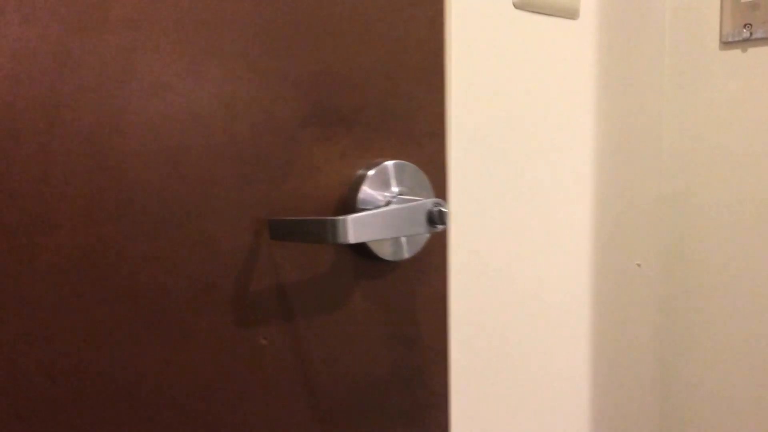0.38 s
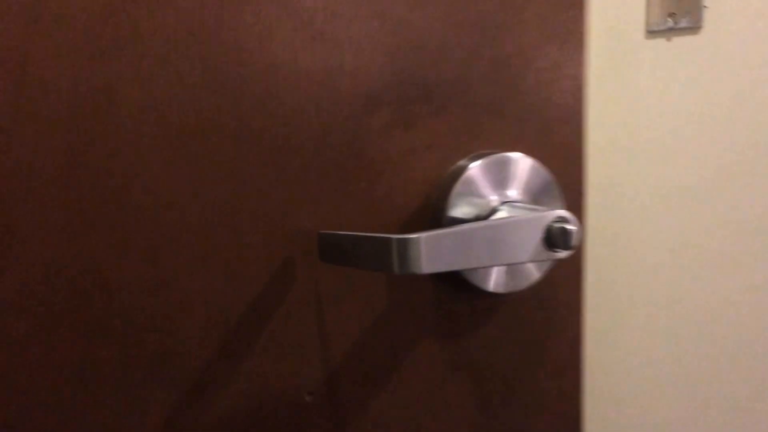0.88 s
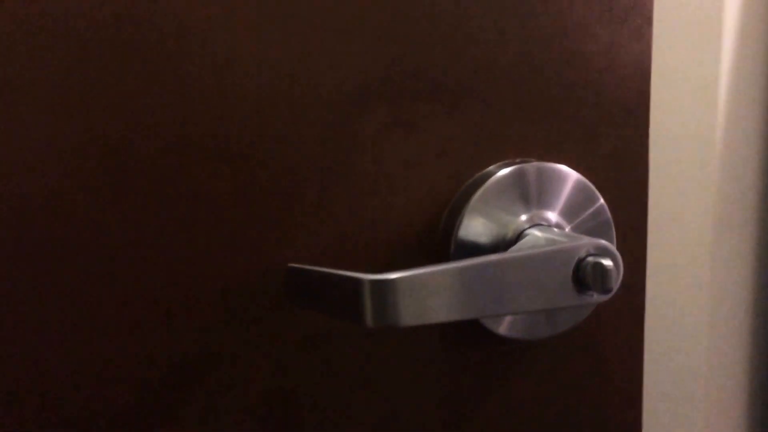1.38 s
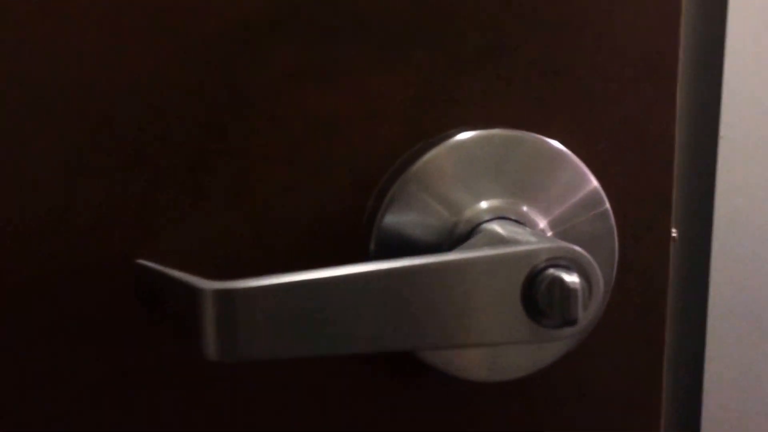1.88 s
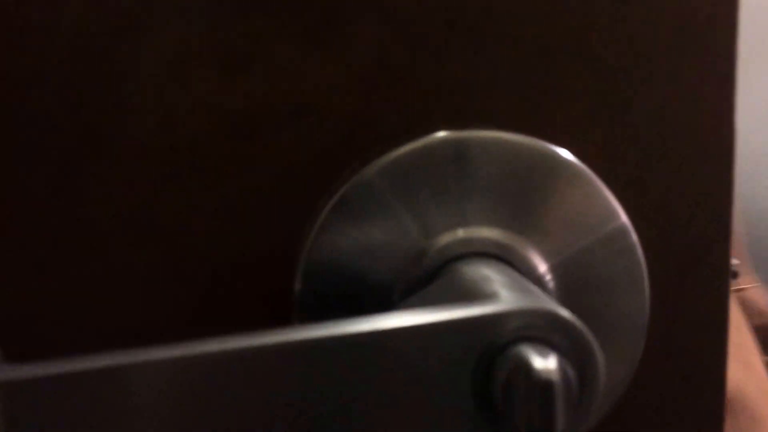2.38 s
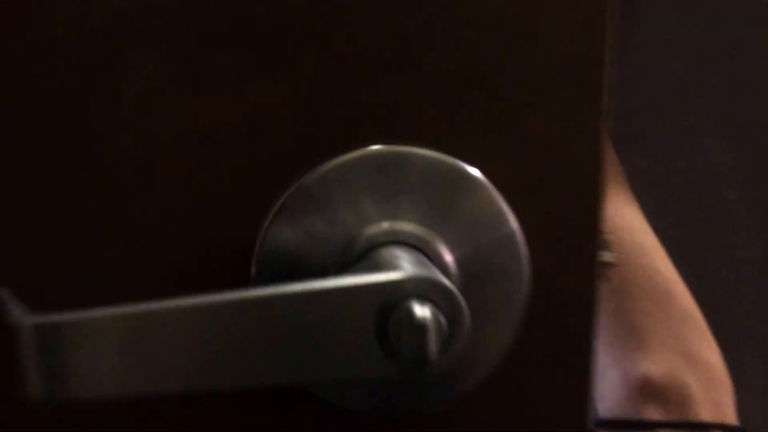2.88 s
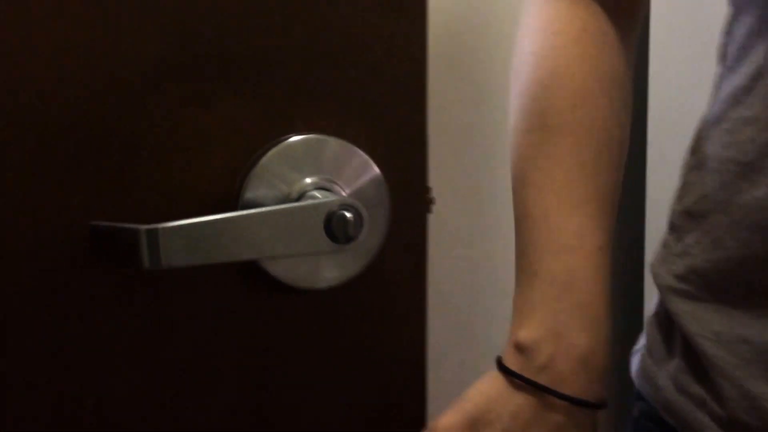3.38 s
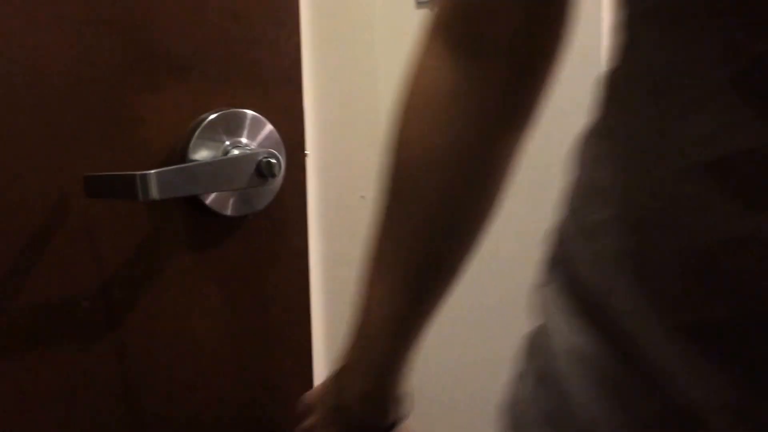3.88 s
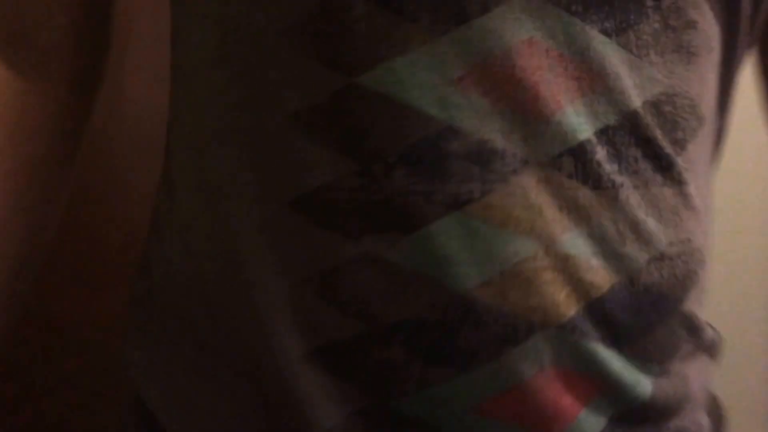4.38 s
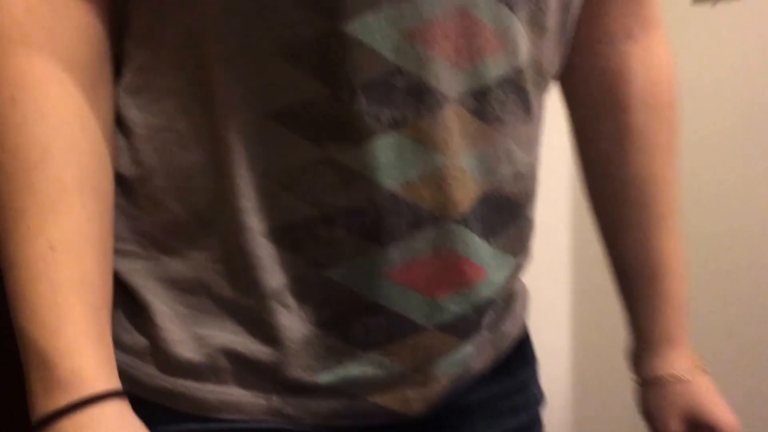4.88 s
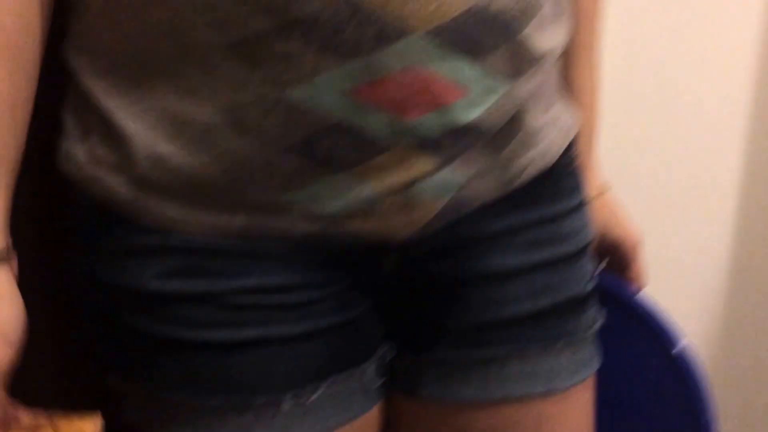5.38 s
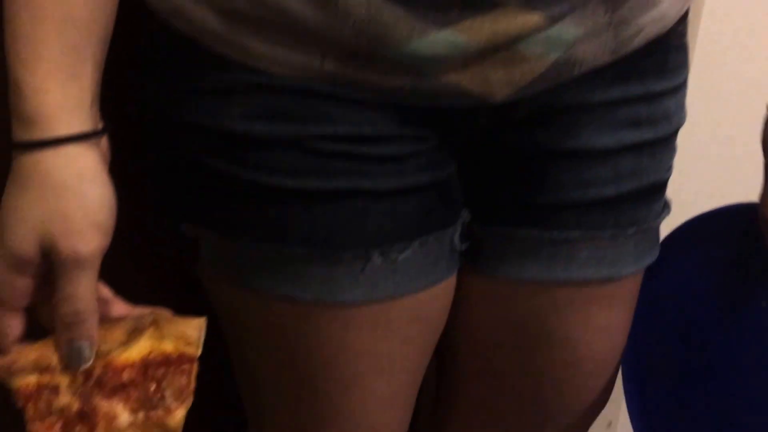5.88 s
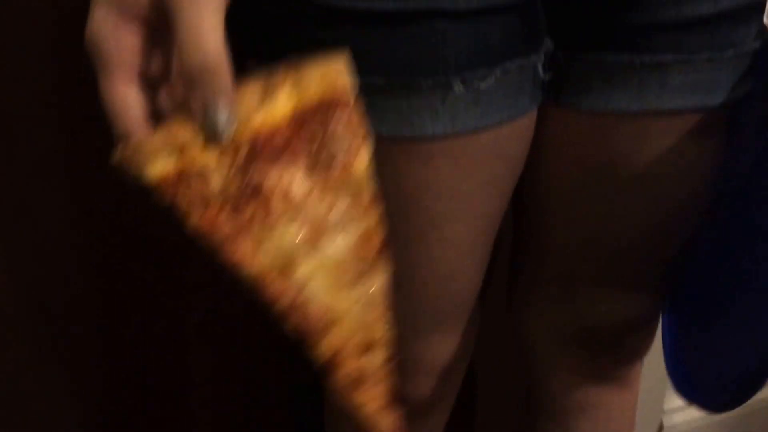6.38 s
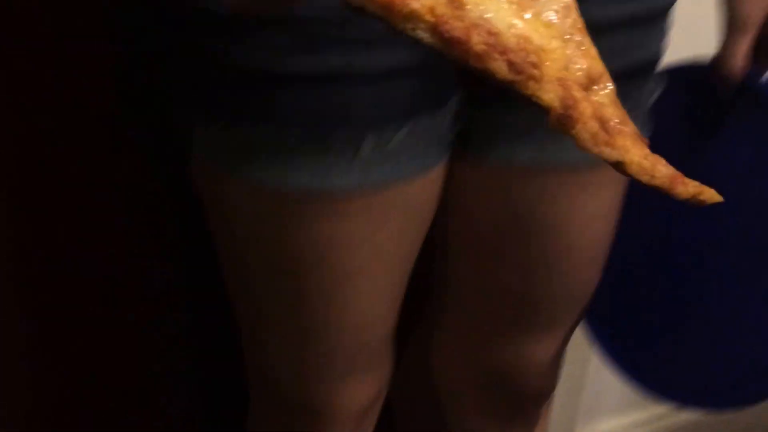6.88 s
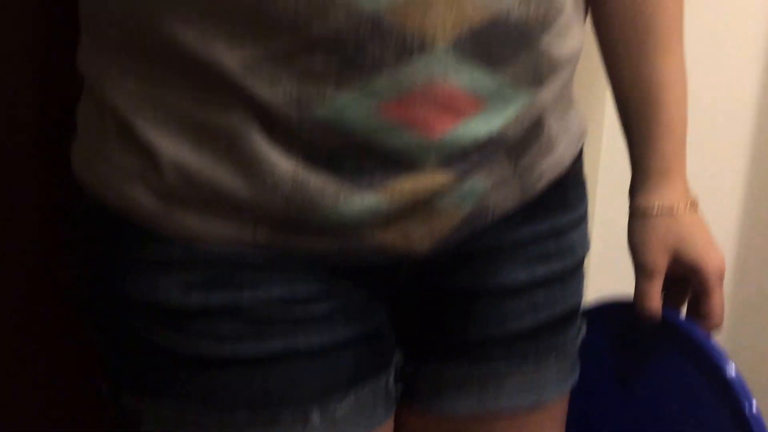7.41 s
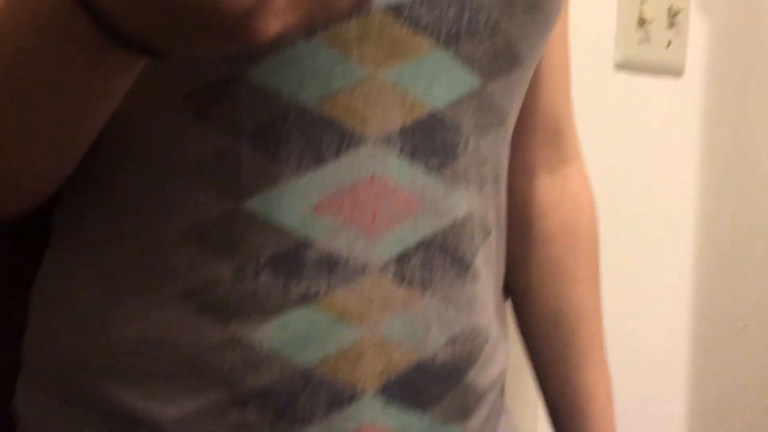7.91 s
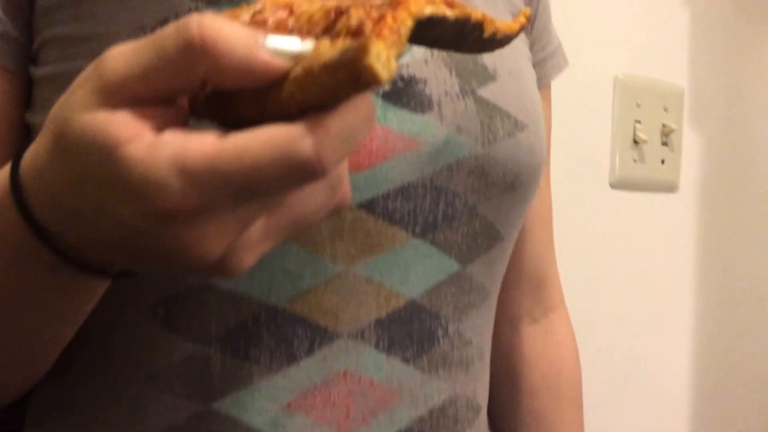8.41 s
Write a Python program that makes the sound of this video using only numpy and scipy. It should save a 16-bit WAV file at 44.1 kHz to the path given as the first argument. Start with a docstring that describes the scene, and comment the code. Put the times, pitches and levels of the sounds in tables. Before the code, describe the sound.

A low, steady ventilation hum fills a small indoor passage. A heavy wooden door with a steel lever handle is worked: muffled latch click, brief rising squeak, busy metallic clatter, two soft knocks, then near quiet. Midway it shuts with a very loud sharp clunk and deep thump, followed by judder, knocks and scuffs. Close microphone with short room reverberation, ducking slightly after the slam; only hum and air remain.

```python
"""A wooden door with a metal lever handle, heard close by in a small hard hallway over droning ventilation.
First the latch clicks behind the closed leaf, then a stick-slip hinge squeaks and more clicks and knocks follow;
light contacts slide while hand, feet and clothes rub as grainy noise. At 4.5 s the bolt rides the strike plate
and the leaf slams, rebounds and settles: contact forces ring steel and wood, and noise thumps the wall and rattles
the frame. A few small knocks from plate or feet follow, then mostly ventilation is left. The microphone's gain
control ducks after loud blows."""
import sys
import numpy as np
from scipy import signal
from scipy.fft import rfft, irfft, next_fast_len
from scipy.io import wavfile
from scipy.ndimage import uniform_filter1d, map_coordinates

SR = 44100
rng = np.random.default_rng(int(sys.argv[2]) if len(sys.argv) > 2 else 0)


def int16_out(signal):
    """Quantize to a 16-bit WAV file."""
    q = np.round(np.clip(np.atleast_2d(signal).T, -1, 1) * 32767)
    wavfile.write(sys.argv[1], SR, q.astype(np.int16))


def linear_from_db(decibels):
    """Turn decibels (scalar or array-like) into linear amplitude factors; 0 gives 1."""
    return 10 ** (np.asarray(decibels, float) / 20)


N = 375902

# Ventilation in the room; the open door weakens the low resonance and lets rumble in:
# t/s, low resonance level/dB, rumble level/dB, air level/dB
DRONE_LEVELS = [(0.0, -42, -52, -50.5), (0.4, -44, -56, -50), (1.2, -42, -56, -52), (1.8, -48, -57, -52.5),
                (2.65, -47, -49, -52.5), (3.5, -46.5, -45, -52), (4.3, -50, -52, -54),
                (4.55, -50, -60, -54), (5.4, -49, -58, -55), (5.9, -45, -60, -51), (7.0, -46, -58, -51),
                (7.3, -44, -52, -51), (7.8, -47, -56, -51), (8.52, -44, -54, -51)]
# Rumble through the open door: f/Hz, relative density level/dB
RUMBLE_SPECTRUM = [(20, -20), (40, -5), (58, 15), (75, 9), (95, 7), (125, -41)]
# Rush of ventilation air: f/Hz, relative density level/dB
AIR_SPECTRUM = [(80, -10), (110, -12), (180, -10), (300, -18.5), (400, -19.5), (600, -26), (2000, -32),
                (2500, -40.5), (3000, -39.5), (3600, -38), (7000, -44.5), (9000, -49), (15000, -58)]
# Narrow duct resonances: f/Hz, width/Hz, mean rms level/dB
DUCT_MODES = [(195.3, 32, -56), (250, 26, -56.5), (293.2, 15.4, -60), (461, 25, -60), (528.6, 20, -67.5),
              (921, 10, -74), (3426, 73, -78), (5190, 200, -81.5), (6210, 250, -81.5), (7100, 310, -87)]
# Motor lines: f/Hz, level/dB before a common lift
MOTOR_LINES = [(59.2, -55), (118.4, -55), (1468, -71), (1938, -74.5)]
# Rubbing of hand, feet and clothes: t/s, scuff level/dB, cloth level/dB, both before their flutter
RUBBING_LEVELS = [(0.0, -64, -85), (0.2, -56, -66), (0.33, -66, -85), (0.68, -59, -76), (0.84, -56, -61),
                  (1.03, -47, -66), (1.19, -66, -66), (1.45, -63, -63.5), (1.9, -68, -68), (2.25, -57, -69),
                  (2.4, -70, -100), (3.23, -79, -97), (3.44, -57, -65), (3.6, -57, -62), (3.75, -70, -72),
                  (4.5, -80, -72), (4.88, -70, -90), (5.0, -60, -64), (5.12, -75, -85), (5.35, -66, -61),
                  (5.56, -55, -56), (5.66, -63, -68), (6.2, -64, -68), (6.6, -80, -85)]
# Dull rubbing and scuffing: f/Hz, relative density level/dB
SCUFF_SPECTRUM = [(200, -35), (500, -0.5), (1200, -6), (2000, -8.5), (3000, -20), (5000, -75)]
# Moving cloth: f/Hz, relative density level/dB
CLOTH_SPECTRUM = [(1500, -31), (3000, 1), (5000, -2.5), (8000, -6), (12000, -13), (15500, -7)]
# Decay of the hallway: f/Hz, t60/s
HALL_DECAY = [(100, 1), (500, 0.31), (2000, 0.26), (6000, 0.21), (14000, 0.069)]
# Heavy blows that shake the frame: t/s, starting thump level/dB, rattle over thump level/dB, thump t60/s
FRAME_BLOWS = [(0.19, -35, -22, .4), (0.338, -29, -14, .45), (1.085, -33, -16, .3),
               (4.613, -15.5, -0.4, .56), (4.92, -38, 1.5, .6), (5.275, -20.5, -13, .36)]
# Thump of wall and floor: f/Hz, relative density level/dB
THUMP_SPECTRUM = [(25, -20), (45, -6), (65, 3), (105, 4), (180, -1.5), (300, -6), (500, -9), (900, -25),
                  (2500, -80)]
# Rattle of the frame: f/Hz, relative density level/dB
RATTLE_SPECTRUM = [(150, -14), (500, -0.6), (1200, -5), (2300, -7), (3200, -19), (5000, -36), (12000, -65)]
# Squeaking hinge: t/s, slip rate f/Hz, level/dB
HINGE_SQUEAK = [(.58, 358, -81), (.62, 371.4, -54), (.66, 374, -47), (.7, 393, -42.5), (.73, 430, -61),
                (.77, 485, -45), (.8, 475, -56), (.83, 451, -46), (.86, 457, -76)]
# Resonances of the latch steel: f/Hz, width/Hz, level/dB
LATCH_MODES = [(1660, 325, 3), (2016, 170, 8), (2130, 360, 4), (2750, 480, 1), (2850, 660, 1),
               (3545, 950, -2.5), (4020, 310, 0.5), (4500, 480, -5.5)]
# Resonances of thin steel parts: f/Hz, width/Hz, level/dB
SIZZLE_MODES = [(5120, 700, 1.5), (5810, 900, 2.5), (6480, 870, 1), (7730, 1470, -3), (9420, 1400, -3.5),
                (10950, 1330, -5.5), (12900, 2700, -11.5)]
# Resonances of the wooden panel: f/Hz, width/Hz, level/dB
PANEL_MODES = [(292, 73, -5.5), (340, 64, -0.5), (430, 63, 0), (535, 87, -0.5), (700, 78, 0.5),
               (810, 92, 0.5), (935, 128, 3.5), (1110, 112, 1), (1236, 120, 1.5), (1440, 200, 0.4)]
# Bending of the whole leaf: f/Hz, width/Hz, level/dB
LEAF_MODES = [(46.3, 14, -15.5), (68, 4.7, -7), (112, 12.5, -3.5), (153.7, 11, 5.5), (218, 90, -7.5),
              (253, 12, -6.5)]
# Soft sliding contacts: t/s, latch force level/dB, sizzle over latch level/dB, wood over latch level/dB, swell/ms
SLIDE_EVENTS = [(0.1381, -43, -34.5, -1.1, 7.9), (0.7442, -39, -30, -18, 24),
                (0.8759, -28, -9.5, -5.5, 7.8), (1.0744, -25.5, -29, -1.5, 9.6),
                (1.0879, -24, -9, -0.6, 5.8), (1.4501, -47.5, -3, -1.5, 16), (1.8844, -44.5, -2.5, -26, 12),
                (2.0433, -46, -4, -4, 18), (2.6145, -51, -7, 1.1, 9.8), (3.2365, -40, -5.5, -1.5, 10.6),
                (4.0367, -44, -15, -8.5, 11), (4.0911, -47.5, -9, -19, 11), (4.2794, -53.5, 0, -4, 16),
                (4.4792, -39, -9, -13, 26), (4.533, -25, -14, -1.1, 10), (4.9361, -40, -32, -6, 17),
                (4.9994, -46.5, -6, -1.1, 15), (5.0619, -40, -26, -8, 6.2), (5.251, -38, -10, 1.5, 12),
                (5.5373, -35, -20.5, -9, 7.1), (5.5694, -39.5, -7.5, -13, 12), (5.7468, -39, -21, -3, 7.9),
                (6.1459, -48, -9, -18, 9.7), (6.2322, -41, -19, -8.5, 9)]
# Steel clicks of latch and handle: t/s, latch force level/dB, sizzle over latch level/dB, chatter decay/ms
CLICK_EVENTS = [(0.1989, -42, 3, 5.4), (0.244, -41, 3.5, 3.7), (0.3339, -15, -7.5, 3.3),
                (0.4199, -39, -13, 6.8), (0.9783, -25.5, -24, 3.5), (1.0022, -31, -6, 4.2),
                (1.0317, -29, -8, 7), (1.045, -21, -7, 4), (1.0525, -19, -14, 2.2), (2.576, -53.5, 6, 3.5),
                (3.903, -58.5, 9, 3.1), (4.5121, -14, -6.5, 10), (4.5203, -6, -12, 3.6),
                (4.5483, -23, -10, 9), (4.5782, -24.5, -8, 5.1), (4.6783, -29, -5, 7),
                (4.7984, -36, -19, 5.8)]
# Knocks, mostly of the door, the last few small ones from plate or feet: t/s, panel force level/dB,
# latch over panel level/dB, sizzle over latch level/dB, leaf over panel level/dB
KNOCK_EVENTS = [(0.345, -26, 0, -32, -4.5), (1.0984, -27.5, 10, -11, -3), (1.5988, -29, -8, -12, -9),
                (1.6083, -29, -4, -22, -8.5), (4.609, -11.5, 0.6, -17, -2.5), (4.7231, -21, 6, -24, -3),
                (4.7337, -21, -7, -28, -31), (4.8783, -29, -4, -27, -5.5), (4.9199, -26, -3, -29, -6),
                (5.1813, -30, 5, -22, -0.6), (5.1943, -27, -6, -44, -8), (5.2782, -19.5, -10, -21, 1.5),
                (5.3437, -44, 0, -7, 3), (5.4922, -43, 9, -20, -2.2), (5.7827, -33, 6, -20, -33),
                (5.9535, -41, 7, -24, -9)]
# First rebound of the slammed leaf: columns as for the knocks
FIRST_REBOUND = (4.618, -9, -1.5, -12, -1.5)
# Overall tone of what is heard, including the treble cut-off near 15 kHz: f/Hz, level/dB
OVERALL_TONE = [(15, -20), (35, 8), (60, -1), (14800, 1.5), (15300, -10), (15600, -22), (17000, -41)]


def unit(x):
    """Scales a signal to rms 1."""
    return x / np.sqrt(np.mean(x ** 2) + 1e-20)


def along(points, hz):
    """Values at hz from (f/Hz, value) points on a log frequency axis."""
    f, value = np.transpose(points)
    return np.interp(np.log(hz + 1), np.log(f + 1), value)


def curves(rows):
    """One value per sample for each column after the time."""
    s, *columns = np.transpose(rows)
    return [np.interp(np.arange(N) / SR, s, column) for column in columns]


def wobble(rate):
    """A smooth random curve with rate knots a second."""
    knots = rng.standard_normal(int(N * rate / SR) + 4)
    return map_coordinates(knots, [np.arange(N) * rate / SR])


def filtered(x, response):
    """x through a complex response of frequency."""
    m = next_fast_len(N + SR // 2)
    return irfft(rfft(x, m) * response(np.fft.rfftfreq(m, 1 / SR)), m)[:N]


def noise(spectrum):
    """Coloured noise of rms 1, empty up to the first frequency of its spectrum."""
    white = rng.standard_normal(N)
    return unit(filtered(white, lambda hz: linear_from_db(along(spectrum, hz)) * (hz > spectrum[0][0])))


def resonance(f, modes, scatter_db):
    """Causal sum of damped modes with alternating signs and randomly scattered strengths."""
    total = 0
    for k, (centre, width, db) in enumerate(modes):
        strength = (-1) ** k * linear_from_db(db + scatter_db * rng.standard_normal())
        total = total + strength * 1j * f * width / (centre ** 2 - f ** 2 + 1j * f * width)
    return total


def rung(x, modes):
    """x through resonances of fixed strength."""
    return filtered(x, lambda f: resonance(f, modes, scatter_db=0))


def narrow(hz, width):
    """Noise of rms 1 passed twice through one resonance, which makes it steep."""
    mode = [(hz, width, 0)]
    return unit(rung(rung(rng.standard_normal(N), mode), mode))


def ventilation():
    """Air noise, narrow duct resonances, a strong low resonance, rumble and wavering motor lines."""
    t = np.arange(N) / SR
    boom_db, rumble_db, air_db = curves(DRONE_LEVELS)
    air = linear_from_db(2) * noise(AIR_SPECTRUM)
    # the ducts rise and fall with the air
    ducts = sum(linear_from_db(db - np.mean(air_db)) * narrow(hz, width) for hz, width, db in DUCT_MODES)
    boom = linear_from_db(boom_db) * narrow(hz=148.5, width=15)
    rumble = linear_from_db(rumble_db) * noise(RUMBLE_SPECTRUM)
    hum = np.zeros(N)
    for hz, db in MOTOR_LINES:
        strength = linear_from_db(db + 3.5 + 0.83 * wobble(1.516))
        hum += strength * np.sin(2 * np.pi * hz * t + 0.27 * wobble(3.14))
    return linear_from_db(air_db) * (air + ducts) + boom + rumble + hum


def rubbing():
    """Hand, feet and clothes rub: dull scuffing and brighter cloth noise, both in fast uneven grains."""
    scuff_db, cloth_db = curves(RUBBING_LEVELS)
    scuff = linear_from_db(scuff_db + 4.2 * wobble(25)) * noise(SCUFF_SPECTRUM)
    cloth = linear_from_db(cloth_db + 1.4 * wobble(53)) * noise(CLOTH_SPECTRUM)
    return scuff + cloth


def hall(x):
    """Each frequency of the hallway's answer dies at its own speed; every stretch gets a new tail."""
    wet = np.zeros(N + 2 * SR)
    step = SR // 8
    delay = 130  # samples, about 3 ms
    for start in range(0, N, step):
        hz, t, z = signal.stft(rng.standard_normal(SR // 2), SR, nperseg=256)
        decay = linear_from_db(-60 * t / along(HALL_DECAY, hz)[:, None])
        tail = signal.istft(z * decay, SR, nperseg=256)[1]
        echo = signal.fftconvolve(x[start:start + step], tail / np.linalg.norm(tail))
        wet[start + delay:][:len(echo)] += echo
    return wet[:N]


def frame():
    """Heavy blows thump the wall, leave the frame rattling and stir the low room resonance."""
    s, db, rattle_db, t60 = np.transpose(FRAME_BLOWS)[:, :, None]
    since = np.maximum(np.arange(N) / SR - s, 0)
    rise = 1 - np.exp(-since / .012)  # s
    thump_shake = linear_from_db(db - 60 * since / t60) * rise
    rattle_shake = linear_from_db(db + rattle_db - 60 * since / (.8 * t60)) * rise  # the rattle dies sooner
    thump = noise(THUMP_SPECTRUM) + linear_from_db(-3) * narrow(hz=150, width=14)
    rattle = linear_from_db(1.8 * wobble(30)) * noise(RATTLE_SPECTRUM)
    return thump_shake.sum(axis=0) * thump + rattle_shake.sum(axis=0) * rattle


def hinge():
    """Stick-slip pulses at an unsteady rate ring the panel and the latch."""
    hz, db = curves(HINGE_SQUEAK)
    cycles = np.floor(np.cumsum(hz * (1 + 0.035 * wobble(60))) / SR)
    slips = np.diff(cycles, prepend=0) * linear_from_db(3.6 * rng.standard_normal(N))
    t = np.arange(N) / SR
    moving = (t > HINGE_SQUEAK[0][0]) & (t < HINGE_SQUEAK[-1][0])
    soft = filtered(slips, lambda f: 1 / (1 + 1j * f / 3000) ** 2)  # a slip is not quite sudden
    ringing = rung(soft, PANEL_MODES) + 0.8 * rung(soft, LATCH_MODES[:3])
    return unit(ringing) * linear_from_db(db) * moving


def contacts(rebounds=4):
    """Every hard contact as (t/s, latch/dB, sizzle over latch/dB, panel/dB, leaf/dB, chatter/ms)."""
    wood_db, thud_db = -19, -23  # how little of a click reaches panel and leaf
    clicks = [(s, db, sizzle, db + wood_db, db + thud_db, ms) for s, db, sizzle, ms in CLICK_EVENTS]
    gap_s, loss_db = .0125, 3  # between rebounds
    s, db, *colour = FIRST_REBOUND
    judder = [(s + k * gap_s, db - k * loss_db, *colour) for k in range(rebounds)]
    knock_ms = 3.5
    knocks = [(s, db + steel, sizzle, db, db + thud, knock_ms)
              for s, db, steel, sizzle, thud in KNOCK_EVENTS + judder]
    return clicks + knocks


def chatter(shape, levels_db, crack):
    """Uneven contact noise under one shape with a single crack at its start, a row per body."""
    grains = linear_from_db(3.4 * rng.standard_normal(len(shape)))
    rough = shape * rng.standard_normal((3, len(shape))) * grains
    first = np.arange(len(shape)) == 0
    return (rough + crack * first) * linear_from_db(np.array(levels_db)[:, None])


def corners(s, sizzle_db):
    """Roll-off f/Hz of latch, sizzle, panel and leaf: contacts with little sizzle are soft and dull."""
    opens = 1.3  # s; until then the hand works the far handle and the closed leaf dulls the sizzle
    return 7000 * linear_from_db(0.33 * sizzle_db), (6300 if s < opens else 18000), 1600, 900


def add(out, s, forces, bodies, corners_hz):
    """Rounded-off contact forces ring their bodies; each lands on a new spot, so mode strengths differ."""
    size = 2 ** 14  # samples
    f = np.fft.rfftfreq(size, 1 / SR)
    spectrum = 0
    for force, modes, corner in zip(forces, bodies, corners_hz):
        ring = resonance(f, modes, scatter_db=1.4) / (1 + 1j * f / corner) ** 2
        spectrum = spectrum + rfft(force, size) * ring
    sound = irfft(spectrum)
    out[round(s * SR):][:len(sound)] += sound


def door():
    """Hits crack at once, chatter briefly and push leaf and panel; slides swell and fade."""
    out = np.zeros(N + SR)
    t = np.arange(SR // 10) / SR
    # dB: how readily latch, sizzle, panel (and leaf) answer a force
    hit_rings_db, slide_rings_db = (7, 8.5, 19, 25), (1.5, -1.1, 11)
    for s, db, sizzle_db, wood_db, thud_db, ms in contacts():
        fade = (1 - np.exp(-t / 0.0011)) * np.exp(-1000 * t / ms)
        levels_db = np.add([db, db + sizzle_db, wood_db], hit_rings_db[:3])
        latch, sizzle, wood = chatter(fade, levels_db, crack=5.96)
        contact = ms / 3300  # s: brief chatter goes with a sharp push
        push = linear_from_db(thud_db + hit_rings_db[3]) * t / contact * np.exp(-t / contact)
        forces = [latch, sizzle, wood + linear_from_db(3) * push, push]
        add(out, s, forces, (LATCH_MODES, SIZZLE_MODES, PANEL_MODES, LEAF_MODES), corners(s, sizzle_db))
    for s, db, sizzle_db, wood_db, ms in SLIDE_EVENTS:
        swell = 1000 * t / ms * np.exp(1 - 1000 * t / ms)
        levels_db = np.add([db, db + sizzle_db, db + wood_db], slide_rings_db)
        forces = chatter(swell, levels_db, crack=0)
        # the swell begins 7 ms ahead of the listed time
        add(out, s - .007, forces, (LATCH_MODES, SIZZLE_MODES, PANEL_MODES), corners(s, sizzle_db))
    return out[:N]


def scene():
    """The hallway is too small to scatter the deepest notes: only the upper range returns as a diffuse tail."""
    near = door() + hinge()
    upper = filtered(near, lambda hz: (1j * hz / (230 + 1j * hz)) ** 2)
    return (near + linear_from_db(-5.5) * hall(upper) + frame() + rubbing() + ventilation())[None]


def roll_off(x):
    """The treble ends steeply here."""
    return signal.sosfilt(signal.butter(12, 16480, fs=SR, output="sos"), x)


def record(dry):
    """The microphone's gain drops at once on loud blows and recovers steadily; peaks clip softly."""
    t = np.arange(N) / SR
    level = np.sqrt(np.abs(uniform_filter1d(dry[0] ** 2, 441)))  # rms over 10 ms
    over_db = np.maximum(20 * np.log10(level + 1e-9) + 17, 0) * .3  # reduction above -17 dB
    release = 8  # dB a second
    held_db = np.maximum.accumulate(over_db + release * t) - release * t
    gain = linear_from_db(-uniform_filter1d(held_db, 220))  # smoothed over 5 ms
    x = filtered(dry[0], lambda hz: linear_from_db(along(OVERALL_TONE, hz)))[None] * gain
    mix = x / (1 + np.abs(x / .76) ** 4) ** (1 / 4)
    return roll_off(mix)


dry = scene()
out = record(dry)
int16_out(out)
```